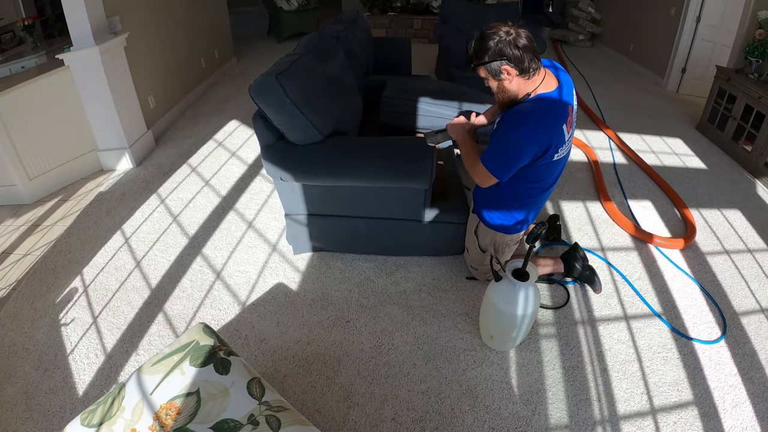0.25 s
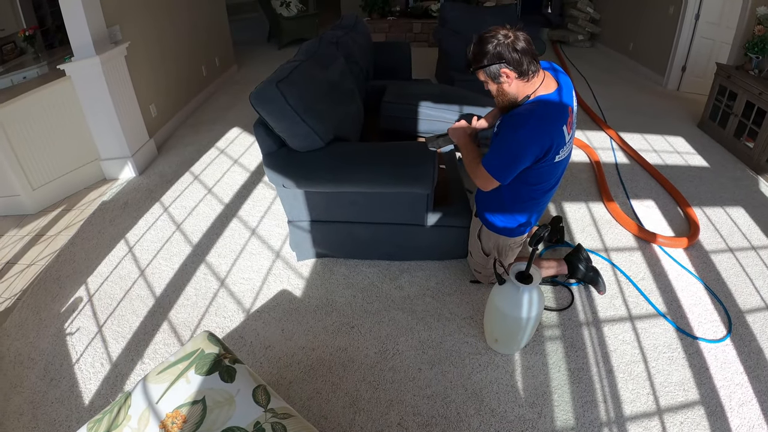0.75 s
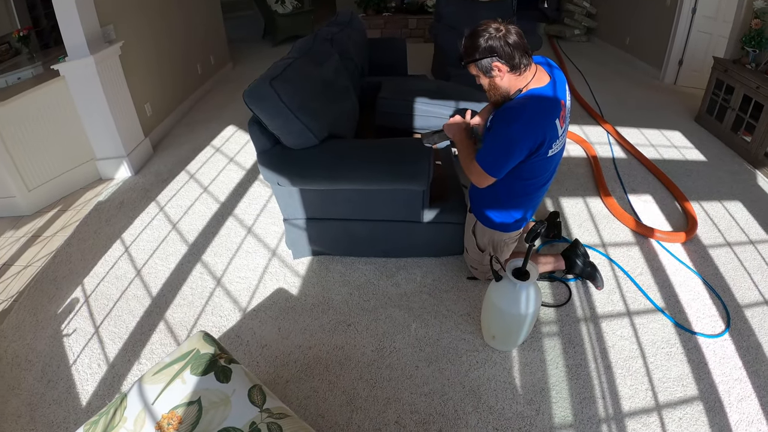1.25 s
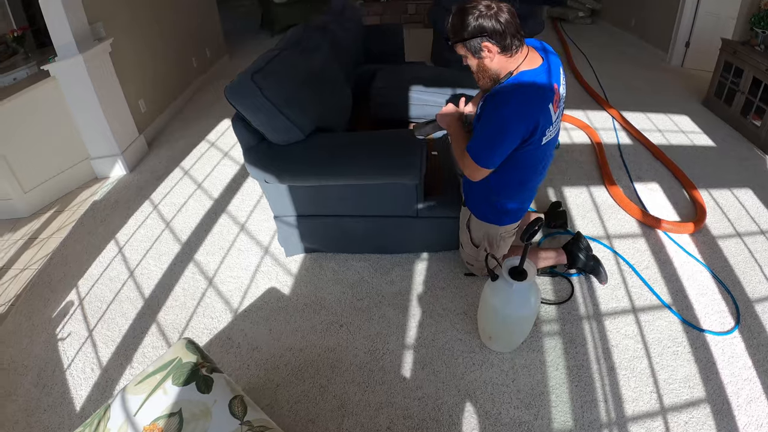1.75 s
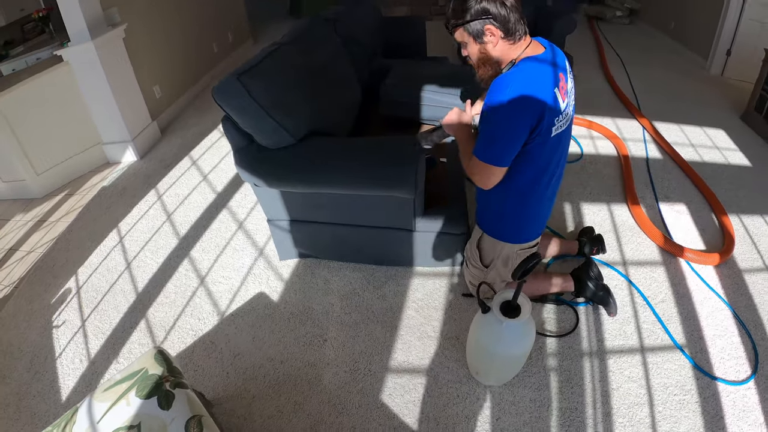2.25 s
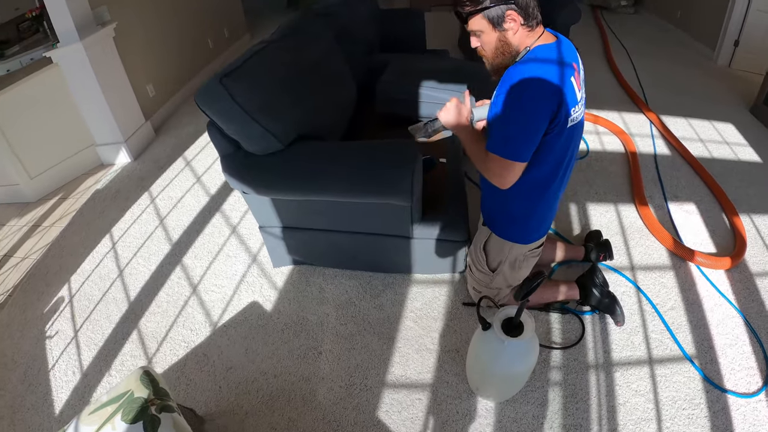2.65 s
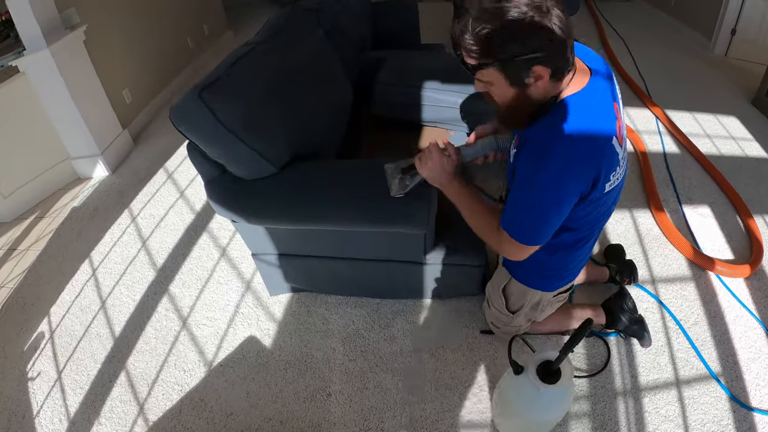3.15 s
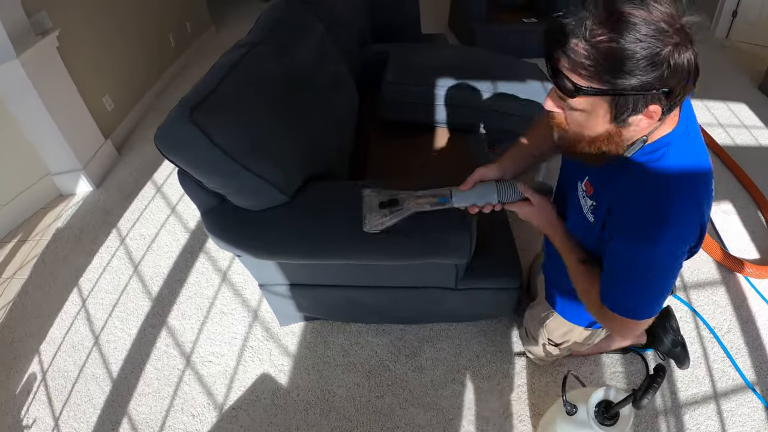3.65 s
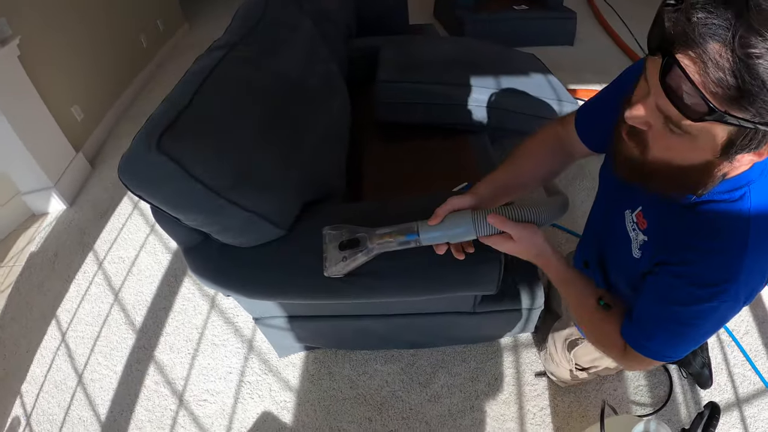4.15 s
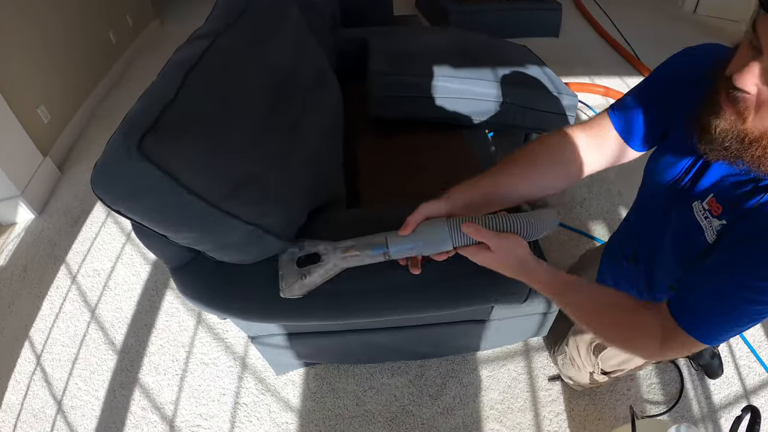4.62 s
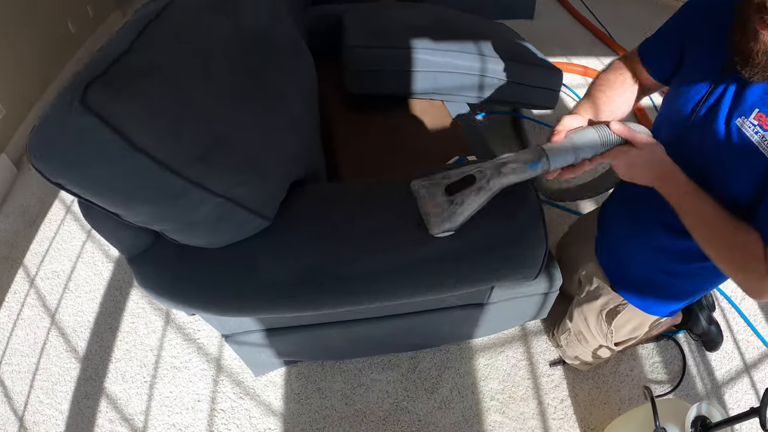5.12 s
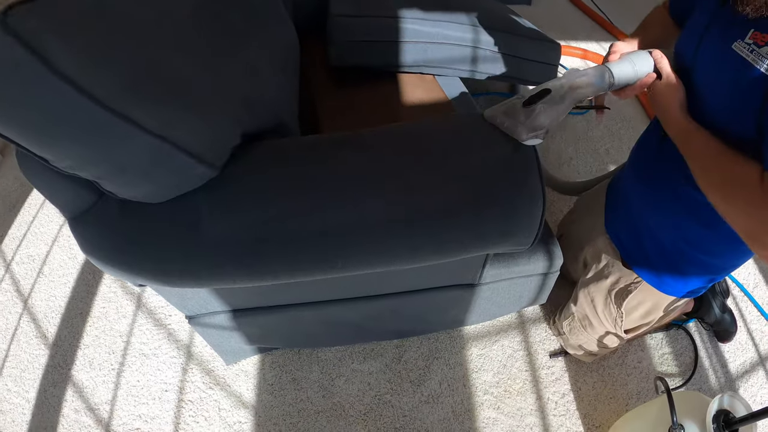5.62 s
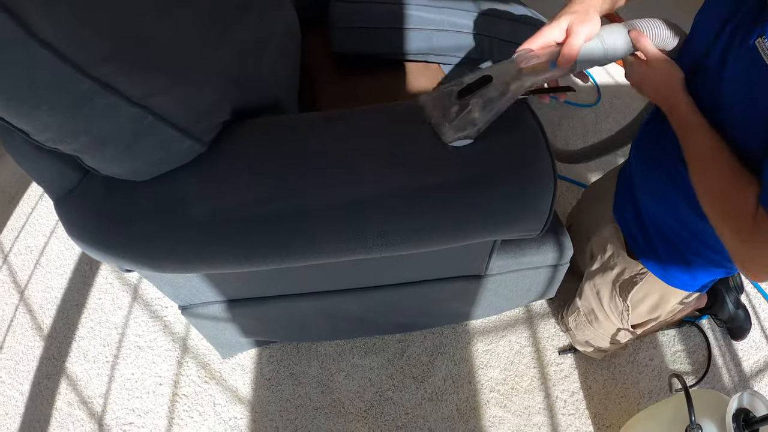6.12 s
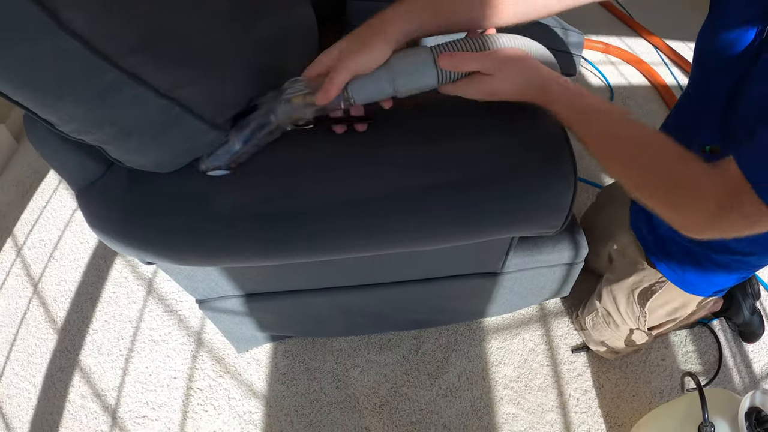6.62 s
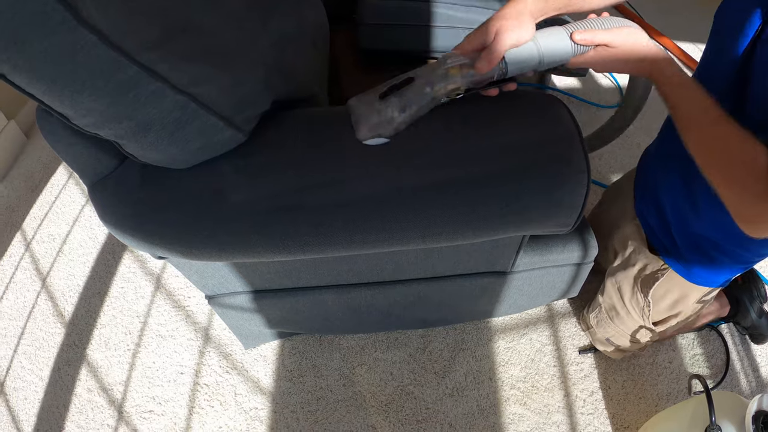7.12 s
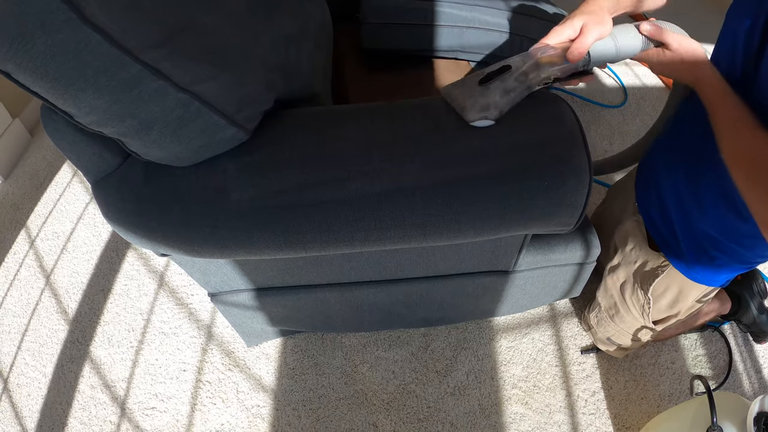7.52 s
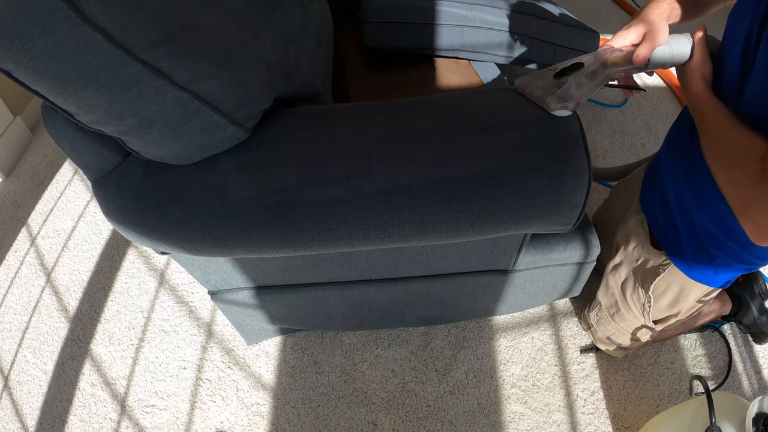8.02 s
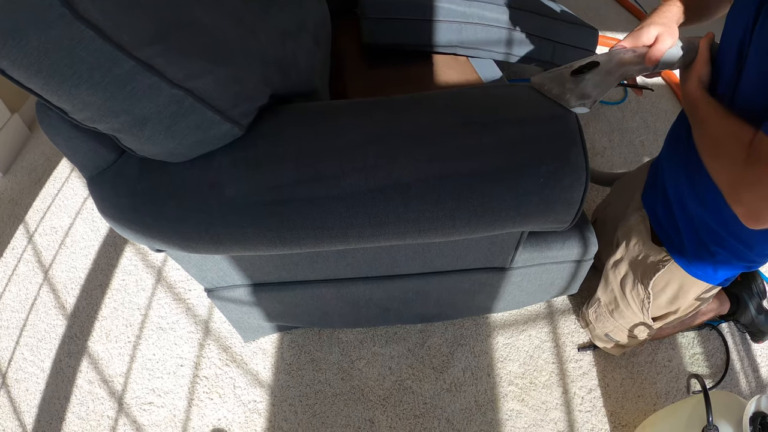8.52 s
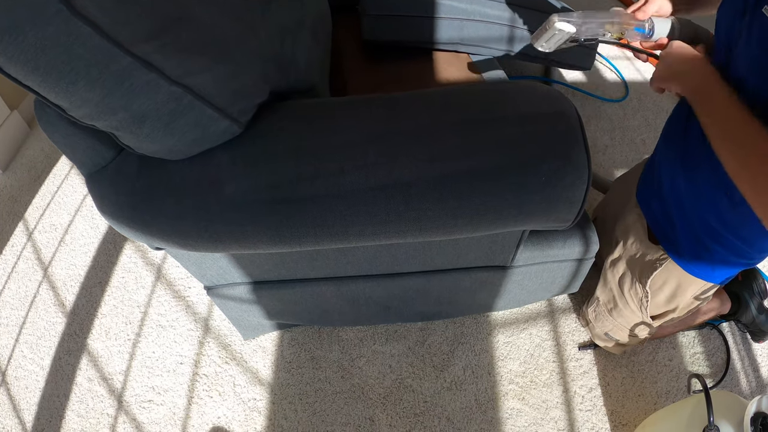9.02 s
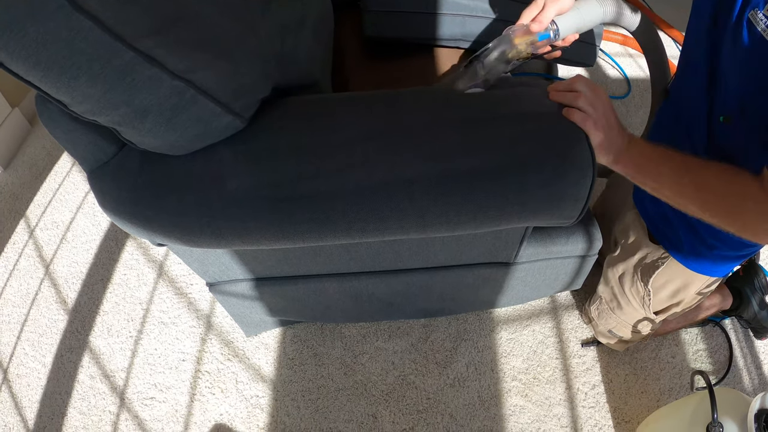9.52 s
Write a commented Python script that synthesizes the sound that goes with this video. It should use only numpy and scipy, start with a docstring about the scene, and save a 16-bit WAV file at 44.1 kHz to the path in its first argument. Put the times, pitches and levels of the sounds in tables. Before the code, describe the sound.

Indoors, a distant machine hums low while a hand suction tool hisses close to the microphone. After a quiet start, wet roars swell as it grips sofa fabric, ending in a slurp. A quick run of dull dabs and bumps follows, then longer presses with a hollow moan and squeak. The open slot hisses brightly, hits one hard bump, and roars again before breaking free.

```python
"""An upholstery extractor's hand tool works over a sofa arm; its machine hums far off, air hisses in the slot.
Short presses come first: filtered turbulence roars and spits droplets. Near 3.5 s a run of dabs and bumps.
Longer presses follow, with damped-mode bumps and gliding-tone moans and squeaks; some end in a slurp.
From 6 s the open slot hisses through squeaks and a hard bump, then the last presses roar and break free."""
import sys
import numpy as np
from scipy import signal
from scipy.fft import irfft
from scipy.io import wavfile
from scipy.ndimage import map_coordinates

SR = 44100
rng = np.random.default_rng(int(sys.argv[2]) if len(sys.argv) > 2 else 0)


def unload_wav(signal):
    """Save mono or channel-first audio to the path in sys.argv[1] as 16-bit WAV at rate SR, clipped to [-1, 1]."""
    wavfile.write(
        sys.argv[1],
        SR,
        np.round(np.clip(np.atleast_2d(signal).T, -1, 1) * 32767).astype(np.int16),
    )


N = 430857

# Table levels are nominal: the functions add trims and slow drifts.
# blower: time_s, pitch_hz, level_db
BLOWER = [(0, 115.1, -52), (1.4, 111.8, -53), (2.85, 116.6, -47.5), (3.4, 119.9, -47), (4.1, 119.9, -50.5),
          (4.75, 120.4, -48), (6, 117.1, -62), (9.35, 115.6, -58.5), (9.55, 120.6, -51.5)]
# blower harmonics: multiple, level_db
BLOWER_ORDERS = [(1, 0), (2, -19.5), (3.5, -26)]
# engine and low rumble: time_s, engine_hz, engine_db, rumble_db
ENGINE = [(0, 32.6, -50.5, -62), (1.3, 33.4, -53.5, -65.5), (2.6, 32.84, -52, -60.5),
          (3.8, 34.06, -46.5, -60.5), (4.8, 34.8, -48, -59.5), (6, 34.7, -55, -65),
          (6.6, 34.93, -51, -61.5), (8.5, 33.82, -50.5, -64), (9.77, 33.8, -51, -62)]
# engine harmonics: multiple, level_db
ENGINE_ORDERS = [(1, 1.5), (1.5, -17), (2.5, -9), (3, -16), (5, -23.5), (7, -20)]
# rumble spectrum: frequency_hz, density_db_per_hz
RUMBLE_COLOUR = [(20, -8), (60, 13.5), (100, 0.5), (170, 0.5), (250, -11.5), (400, -12.5), (900, -56)]

# air into the free slot: time_s, rush_db, edge_db (re rush)
OPEN_AIR = [(0, -51, 5.5), (0.12, -56, 8), (1.1, -56.5, 8), (1.7, -53.5, 7), (3.2, -56, 4),
            (3.4, -49.5, -0.5), (4.1, -52, 4.5), (4.33, -53, 4), (4.55, -49, 6), (6.1, -56.5, 4),
            (6.4, -51.5, 1.8), (6.72, -49, -1), (6.9, -48.7, 4), (7.5, -52, 6.5), (8.1, -54.5, 6.5),
            (9.77, -53.5, 5.5)]
# jet at the slot lip: time_s, hiss_db, sizzle_db (re hiss)
LIP_JET = [(0, -54, -5.5), (1.1, -53.5, -5), (1.9, -48.5, -8.5), (2.25, -49, -9), (2.42, -52.5, -9),
           (2.9, -49, -7), (3.25, -54, -4.5), (3.55, -45, -3), (4.4, -48.5, 0), (4.73, -43, -6),
           (5.3, -47.5, -1), (5.6, -48.5, -4), (6.07, -49.5, -9), (6.4, -45.5, -5.5), (6.78, -41, -6.5),
           (7.25, -47, -2), (8.4, -45.5, -9), (8.88, -46.5, -5), (8.97, -47.5, -10), (9.35, -48.5, -8.5),
           (9.77, -44, -10)]
# air noise spectra: frequency_hz, density_db_per_hz
OPEN_COLOUR = [(130, -10), (230, 0), (390, -4.5), (560, -6), (853, -4), (1220, 2.5), (1820, 3), (3220, 6),
               (5000, 4), (7000, -2.5), (10400, -28)]
ROAR_COLOUR = [(100, -10), (180, -11), (297, -8.5), (505, -14), (800, -5), (1200, 3), (2110, 3.5),
               (3980, 6.5), (6550, -1.5), (10000, -42)]
JET_COLOUR = [(3240, -8), (5500, 4.5), (7440, 1), (8910, 2.5), (11000, -5.5), (12300, -8), (15700, -18)]
# bright air band as the tool reaches forward: time_s, centre_hz, level_db
REACH = [(3.4, 6230, -47.5), (4.05, 6100, -48), (4.35, 5200, -44.5), (4.7, 4730, -48), (4.9, 4510, -44)]
# peaks and notches of free slot, covered mouth and jet, by pose:
# start_s, [(centre_hz, width_hz, gain_db)]
OPEN_POSES = [(0, [(590, 130, -5), (880, 140, 8.5), (1090, 92, -3), (1220, 140, 5.5), (1480, 85, 0),
              (1670, 100, 6.5), (2070, 170, 5), (2805, 220, 8.5), (3260, 80, 6.5), (3600, 140, 9),
              (4040, 170, 3.5), (4810, 91, 7)]), (2.4, [(1520, 90, -3), (1940, 210, -3)]),
              (3.9, [(400, 160, 0.5), (590, 250, -5), (900, 120, 1.5), (1080, 120, -6), (1190, 370, 3),
              (2180, 1400, -6), (6140, 2000, 8)]), (6, [(1280, 110, -2.5), (3170, 775, 4), (3900, 125, 3),
              (5030, 510, 2.5)]), (7.5, [(1179, 430, 4.5), (1284, 135, -7), (6150, 600, -4.5)])]
MOUTH_POSES = [(0, [(1260, 120, 5), (1440, 130, -9), (1630, 210, 5), (2780, 560, 12.5), (3560, 290, 12)]),
               (1, [(510, 120, -6.5), (980, 335, -6), (1350, 90, -7.5), (1690, 240, -6), (3150, 645, 5.5),
               (4770, 560, 4)]), (2.07, [(370, 87, -1), (526, 100, -13), (1120, 92, 6), (1620, 80, -12),
               (1900, 830, 12.5), (2870, 900, 9), (2920, 125, -6), (4360, 170, -7), (4600, 485, 6.5)]),
               (2.34, [(340, 170, 5), (503, 90, 0), (657, 120, 10), (840, 225, 6.5), (1790, 150, 2),
               (2200, 220, 4), (2430, 360, -6), (3000, 900, 5.5), (4380, 375, -5), (4670, 350, 6.5)]),
               (2.95, [(1740, 130, 7), (4130, 260, 3), (4700, 205, -5), (5100, 210, 7)]),
               (4, [(440, 70, -8), (610, 155, 6.5), (940, 200, 2), (1040, 65, -2.5), (1680, 480, -3.5),
               (2270, 95, -3.5), (3860, 75, 4.5)]), (5.15, [(554, 320, 5), (940, 370, -1), (1191, 170, 5),
               (1360, 190, -4), (3470, 470, 5), (4120, 205, 5), (5106, 150, 4)]), (5.64, [(480, 160, -5),
               (1380, 150, -7), (2320, 420, 6.5), (2570, 280, -1.5), (3380, 760, 0.5), (4690, 205, -2),
               (5700, 1400, -5)]), (8, [(1060, 370, 5.5), (1320, 370, -8.5), (1690, 300, 6.5),
               (2610, 150, -6), (3080, 115, 2), (3480, 130, 4), (4580, 165, -6), (6200, 600, -9)]),
               (8.96, [(745, 170, -15), (820, 810, 13.5), (1320, 60, -5), (1990, 330, 6.5),
               (2340, 130, 2.5), (2790, 65, 3), (3090, 365, 6), (4520, 120, -7), (5670, 405, -6)])]
JET_POSES = [(0, [(8730, 400, 1), (12100, 500, -1)]), (3.4, [(8700, 500, 3), (12150, 600, 1)]),
             (5.45, [(8800, 790, 4.5), (11300, 1000, -3)]), (6.2, [(8800, 500, 3), (9700, 500, 1),
             (12300, 700, 3)]), (7.4, [(8400, 740, 3.5), (11900, 800, 3)])]

# bumps of tool and hose on padding: start_s, level_db, pitch_hz, t60_s
BUMPS = [(0.021, -39, 62, 0.21), (3.412, -26, 260, 0.024), (3.64, -27, 270, 0.024),
         (3.723, -26.5, 260, 0.028), (3.812, -30, 236, 0.03), (3.902, -33, 277, 0.034),
         (4.388, -33, 380, 0.018), (7.559, -36, 227, 0.041), (7.77, -38, 188, 0.084),
         (2.299, -35, 210, 0.1), (8.95, -35, 202, 0.081), (6.411, -31, 356, 0.023),
         (6.711, -32.5, 524, 0.03), (6.8302, -19.5, 141, 0.05), (6.872, -41, 190, 0.054),
         (9.4599, -23, 117, 0.03), (9.463, -32, 200, 0.029)]
# hollow drag on padding, one curve each: time_s, pitch_hz, level_db
MOANS = [
    [(4.735, 170, -53), (4.765, 210, -47), (4.795, 169, -49)],
    [(4.79, 301, -57), (4.89, 302, -49), (4.97, 300, -42), (5.09, 300, -57), (5.2, 255, -56),
     (5.36, 230, -51), (5.45, 207.7, -51.5), (5.6, 178.4, -55)],
]
# lip squeaks on cloth, one curve each: time_s, pitch_hz, level_db
SQUEAKS = [
    [(4.935, 570, -50), (4.955, 627, -45), (4.972, 775, -44.5), (4.99, 800, -50)],
    [(6.27, 683, -68), (6.395, 795, -55), (6.415, 725, -56), (6.495, 719, -58), (6.535, 685, -60),
     (6.58, 684, -59), (6.61, 743, -61), (6.67, 680, -60)],
    [(6.712, 770, -52), (6.73, 690, -58), (6.75, 490, -58)],
]
# dabs on fabric, and a short droplet click at 3.784 s: peak_s, level_db, rise_s, fall_s, centre_hz
DABS = [(0.228, -41, 0.011, 0.011, 3600), (3.407, -35.5, 0.011, 0.0081, 2110),
        (3.459, -40.5, 0.006, 0.005, 1700), (3.537, -33.5, 0.005, 0.0056, 2500),
        (3.632, -33.5, 0.012, 0.0058, 2700), (3.636, -30, 0.0021, 0.0015, 1600),
        (3.712, -31.5, 0.013, 0.015, 2380), (3.784, -32, 0.001, 0.001, 3000),
        (3.802, -30.5, 0.015, 0.012, 2360), (3.892, -36, 0.016, 0.02, 2470),
        (3.936, -39.5, 0.013, 0.017, 2330), (4.957, -48, 0.018, 0.021, 820),
        (5.624, -28, 0.017, 0.013, 1390), (5.648, -36, 0.01, 0.014, 5000),
        (6.845, -47, 0.0027, 0.004, 1100), (6.886, -35, 0.003, 0.003, 2200)]
# dab resonances: centre_hz, width_hz, gain_db
DAB_MODES = [(1290, 170, 5), (2360, 460, 17.5), (3420, 100, 22), (4770, 1600, 20)]

# presses: start_s, end_s, attack_s, roar_db, swell_db_per_s, edge_db (re roar), hollow_db (re roar)
PRESSES = [(0.178, 0.36, 0.022, -45, -1, 2.5, -26), (1.702, 1.86, 0.082, -43.5, 24, -2, -16),
           (1.85, 1.995, 0.023, -41.5, 5, 0, -18.5), (2.02, 2.072, 0.023, -40, 8, -2.5, -20),
           (2.065, 2.305, .02, -37.5, 25, -1, -11.5), (2.31, 2.95, 0.027, -37, 1.5, -6, -7.5),
           (2.935, 3.045, 0.03, -39, 0, -0.5, -11), (4.655, 4.77, 0.02, -42, 22, -1, -19),
           (4.776, 5.087, 0.038, -35, -25.5, -9, -10), (5.228, 5.62, 0.13, -35, 4, -8.5, -14),
           (5.639, 5.973, 0.012, -37, -5.5, 1.5, -16), (7.698, 7.83, 0.062, -47, 6, 7, -8.5),
           (8.39, 8.845, 0.1, -40.5, -8.5, 1.5, -13.5), (8.852, 8.957, .025, -38, 3, -1, -16),
           (8.96, 9.469, 0.07, -36.5, 1, -3, -9.5)]
# tuning of the mouth by tool tilt: time_s, shift_semitones
MOUTH_TUNING = [(2.3, 0.52), (2.4, 0.047), (2.96, -0.089), (5.62, 0.11), (5.66, -0.7), (5.97, 0.48),
                (8.4, 0.3), (8.9, -0.25), (9.45, -0.062)]
# slurps as the seal breaks: end_s, level_db, build_s
BREAKS = [(3.035, -37, 0.092), (5.97, -39, 0.16), (8.91, -42, 0.11), (9.48, -38, 0.05)]

# microphone ports: frequency_hz, left_lead_rad
PORT_PHASE = [(100, 0.4), (1000, 0.14), (3000, -0.76), (4600, -0.8), (6000, -1.45), (7900, -1.5),
              (8900, -1.1), (10200, -0.9), (11500, -1.9), (13000, -1)]
# frequency_hz, left_re_right_db
PORT_BALANCE = [(100, 1.5), (1000, -1.9), (3000, 0), (5500, -2.5), (7500, -3.5), (8700, -10), (10400, -4.5),
                (12200, -8.3), (13800, -7.5), (15400, -11)]
# frequency_hz, direct_share (at relative distance 1)
DIRECT = [(30, 0.78), (120, 1), (500, 0.87), (1200, 0.83), (2800, 0.87), (4500, 0.68), (7000, 0.77),
          (10500, 0.68), (13000, 0.38), (15500, 0.3)]
# tool bearing: time_s, extra_right_lead_us, port_balance_share, relative_distance
BEARING = [(0, 13, 0.2, 1.7), (1.9, 9, 0.38, 1.1), (2.7, 9, 0.3, 1), (3.5, 8, 0.75, 1.3),
           (4.8, 2, 0.77, 0.68), (5.6, 16, 0.95, 1), (6.2, 20, 1.05, 1.2), (6.85, -8, 0.75, 1),
           (7.4, 14, 0.85, 1.1), (8.1, 26, 1.17, 1), (8.8, 30, 1.05, 1.1), (9.77, 13, 0.86, 0.92)]

FRAME, HOP, CUTOFF_HZ = 1024, 256, 15750
HOLLOW_HZ, THROAT_HZ, EDGE_HZ = (190, 800), (800, 2600), (2600, 6400)
HISS_HZ, SIZZLE_HZ = (6500, 10500), (10500, 16500)
RELEASE_S = 0.044
BREAK_HISS_DB = -10.5   # slurp treble re its body
OPEN_HOLLOW_DB = -11.5   # free-slot hollow re rush
TIME = np.arange(N) / SR
FRAME_S = np.arange(-(-N // HOP) + 1) * HOP / SR
HZ = np.maximum(np.fft.rfftfreq(FRAME, 1 / SR), 1)[:, None]


def from_db(db):
    """Decibels to amplitude gain."""
    return 10 ** (np.asarray(db) / 20)


def rms_one(x):
    """Scale to unit rms."""
    return x / np.sqrt(np.mean(x ** 2) + 1e-20)


def in_time(rows, t):
    """Columns of a curve, interpolated at times t."""
    time_s, *columns = np.transpose(rows)
    return [np.interp(t, time_s, column) for column in columns]


def at_hz(points):
    """Spectrum table on the frequency grid, interpolated in log frequency."""
    hz, value = np.transpose(points)
    return np.interp(np.log(HZ), np.log(hz), value)


def during(rows, t, fade_s=0.012):
    """1 while a curve lasts, with linear fades centred on its ends."""
    inside_s = np.minimum(t - rows[0][0], rows[-1][0] - t)
    return np.clip(inside_s / fade_s + .5, 0, 1)


def gate(start_s, end_s, attack_s, release_s):
    """Smooth attack, hold and release, half open at start and end."""
    attack = 1 + np.tanh(2 * (FRAME_S - start_s) / attack_s)
    release = 1 + np.tanh(2 * (end_s - FRAME_S) / release_s)
    return attack * release / 4


def drift(rate_hz):
    """Unit-rms random wander: two-pole low-passed noise made at SR / 40."""
    pole = np.exp(-80 * np.pi * rate_hz / SR)
    noise = rng.standard_normal(N // 40 + 2002)
    slow = signal.lfilter([1], [1, -2 * pole, pole * pole], noise)[2000:]   # drop the settling
    return np.interp(np.arange(N) / 40, np.arange(len(slow)), rms_one(slow))


def tone(hz):
    """Unit-rms sine following a pitch curve, from a random phase."""
    return np.sqrt(2) * np.sin(2 * np.pi * (np.cumsum(hz) / SR + rng.random()))


def register(colour, edges_hz):
    """Part of a colour between two soft edges, as unit-mean power."""
    low_hz, high_hz = edges_hz
    part = colour ** 2 / (1 + (low_hz / HZ) ** 12) / (1 + (HZ / high_hz) ** 12)
    return part / part.mean(axis=0)


def resonances(modes):
    """Gain of a cavity whose modes stand out of a flat response."""
    power = 1
    for hz, width_hz, db in modes:
        power = power + from_db(db) ** 2 / (1 + (2 * (HZ - hz) / width_hz) ** 2)
    return np.sqrt(power)


def cavity(poses, shift_s=0.028):
    """Peaks and notches of the air path; each pose crossfades to the next."""
    gains = []
    for _, modes in poses:
        gain_db = sum(db / (1 + (2 * (HZ - hz) / width_hz) ** 2) for hz, width_hz, db in modes)
        gains.append(from_db(gain_db))
    gain = gains[0]
    for (start_s, _), following in zip(poses[1:], gains[1:]):
        moved = np.clip((FRAME_S - start_s) / shift_s + .5, 0, 1)
        gain = (1 - moved) * gain + moved * following
    return gain


def gliding_band(centre_hz, width_hz):
    """One air resonance sliding in pitch, as unit-mean power."""
    band = np.exp(-((HZ - centre_hz) / width_hz) ** 2)
    return band / band.mean(axis=0)


def reflections(strength, count=6):
    """Power ripple of echoes off sofa, body and floor; paths sway as the microphone moves."""
    ripple = 1
    depth = 2 * strength / (1 + strength ** 2)
    # columns: delay_s, sway_hz, start_cycles
    for delay_s, sway_hz, start in rng.uniform([.003, .05, 0], [.008, .3, 1], (count, 3)):
        path_s = delay_s + .00008 * np.sin(2 * np.pi * (sway_hz * FRAME_S + start))
        ripple = ripple * (1 + depth * np.cos(np.float32(2 * np.pi * HZ * path_s)))
    return ripple


def intake(colour, throat, hollow, edge):
    """Power of air drawn through the slot: throat roar, hollow below, edge above."""
    return (throat * register(colour, THROAT_HZ) + hollow * register(colour, HOLLOW_HZ)
            + edge * register(colour, EDGE_HZ))


def eddies(drops_per_s, drops_db, flutter_db, flutter_hz):
    """Turbulence as fluttering noise, with sparse impulses for droplets."""
    drops = (rng.random(N) < drops_per_s / SR) * rng.standard_normal(N)
    air = rng.standard_normal(N) + from_db(drops_db) * rms_one(drops)
    return rms_one(air * from_db(flutter_db * drift(flutter_hz)))


def radiate(source, power):
    """Colour a source; its direct part reaches two ports with phase and level offsets, room parts independent."""
    noises = np.float32(np.vstack([source, rng.standard_normal((2, N))]))
    direct, room_left, room_right = signal.stft(noises, nperseg=FRAME, noverlap=FRAME - HOP)[2]
    lead_us, balance_share, distance = in_time(BEARING, FRAME_S)
    phase = np.float32(at_hz(PORT_PHASE) - 2 * np.pi * HZ * lead_us / 1e6)
    tilt = np.float32(from_db(at_hz(PORT_BALANCE) * balance_share / 2))
    share = np.float32(np.clip(at_hz(DIRECT), .01, 1)) ** np.float32(np.abs(distance))
    direct_gain, room_gain = np.sqrt(share), np.sqrt(1 - share)
    turned = direct * (np.cos(phase) + 1j * np.sin(phase))
    left = (direct_gain * turned + room_gain * room_left) * tilt
    right = (direct_gain * direct + room_gain * room_right) / tilt
    centre = (tilt ** 2 + tilt ** -2 + 2 * share * np.cos(phase)) / 4   # power of the ports' mean
    ports = np.array([left, right]) * np.sqrt(np.float32(power) / centre)
    return signal.istft(ports, nperseg=FRAME, noverlap=FRAME - HOP)[1][:, :N]


def orders(hz, levels, waver_db=0.75):
    """Wavering multiples of a turning speed."""
    return sum(from_db(db + waver_db * drift(5.2)) * tone(hz * multiple) for multiple, db in levels)


def machine(blower_db=0.06, engine_db=-2.5, rumble_db=7.5):
    """Distant machine: low orders of blower and engine, over noise rumble of hose and room."""
    hz, db = in_time(BLOWER, TIME)
    blower_hz = hz * (1 + 0.0019 * drift(7.8))
    blower = from_db(db + blower_db + 0.34 * drift(6.2)) * orders(blower_hz, BLOWER_ORDERS)

    hz, db, _ = in_time(ENGINE, TIME)
    engine_hz = hz * (1 + 0.0112 * drift(4.3))
    engine = 0
    for multiple, order_db in ENGINE_ORDERS:
        gain = from_db(db + engine_db + order_db + 1.85 * drift(2.6))
        engine = engine + gain * tone(engine_hz * multiple)

    floor = from_db(at_hz(RUMBLE_COLOUR)) ** 2
    level_db = in_time(ENGINE, FRAME_S)[-1] + rumble_db
    power = floor / floor.mean() * from_db(level_db) ** 2
    return blower + engine + radiate(rng.standard_normal(N), power)


def slurps(attack_s=0.041, release_s=0.0076):
    """Power of air squeezing in while the seal breaks."""
    return sum(from_db(db) ** 2 * gate(end_s - build_s, end_s, attack_s, release_s)
               for end_s, db, build_s in BREAKS)


def open_air(sealed_db=-3.5, rush_db=3.0, seal_s=0.027):
    """Free slot: rush, lip jet and reach band; fabric partly shuts off the rush."""
    covered = sum(gate(start_s, end_s, seal_s, seal_s) for start_s, end_s, *_ in PRESSES)
    db, edge_db = in_time(OPEN_AIR, FRAME_S)
    flow = from_db(db + rush_db + sealed_db * covered) ** 2
    colour = from_db(at_hz(OPEN_COLOUR)) * cavity(OPEN_POSES)
    rush = intake(colour, flow, flow * from_db(OPEN_HOLLOW_DB) ** 2, flow * from_db(edge_db) ** 2)

    hiss_db, sizzle_db = in_time(LIP_JET, FRAME_S)
    lip = from_db(at_hz(JET_COLOUR)) * cavity(JET_POSES)
    hiss = from_db(hiss_db) ** 2 + from_db(BREAK_HISS_DB) ** 2 * slurps()
    jet = hiss * (register(lip, HISS_HZ) + from_db(sizzle_db) ** 2 * register(lip, SIZZLE_HZ))

    reach_hz, reach_db = in_time(REACH, FRAME_S)
    reach_power = from_db(reach_db) ** 2 * during(REACH, FRAME_S)
    reach = reach_power * gliding_band(reach_hz, width_hz=1040)

    power = (rush + jet + reach) * reflections(strength=.055)
    return radiate(eddies(drops_per_s=460, drops_db=-10.0, flutter_db=1.3, flutter_hz=10.4), power)


def bumps(tail_db=-21, tail_t60_s=0.31, slap_db=-15, slap_t60_s=0.047, slap_hz=700):
    """Padded knocks: dull noise slap, heavily damped modes, short room tail."""
    overtones = ((1, 0), (1.45, -8), (2.3, -16), (4.2, -21))   # ratio, level_db
    out = np.zeros(N)
    for start_s, db, hz, t60_s in BUMPS:
        start = int(start_s * SR)
        t = TIME[:min(SR // 2, N - start)]
        body = 0
        for ratio, mode_db in overtones:
            decay = from_db(mode_db - 60 * t * ratio / t60_s)
            body = body + decay * np.sin(2 * np.pi * hz * ratio * t)
        band = signal.butter(2, [hz * 0.6, hz * 1.23], "band", fs=SR, output="sos")
        tail = rms_one(signal.sosfilt(band, rng.standard_normal(len(t))))
        tail = tail * from_db(tail_db - 60 * t / tail_t60_s)
        soft = signal.butter(2, slap_hz, fs=SR, output="sos")
        slap = rms_one(signal.sosfilt(soft, rng.standard_normal(len(t))))
        slap = slap * from_db(slap_db - 60 * t / slap_t60_s)
        onset = 1 - np.exp(-t / 0.0032)
        out[start:start + len(t)] += from_db(db) * (body + slap + tail) * onset
    return out


def rubbing(rows, jitter, rough_db, level_db):
    """Tool sliding on cloth: a tone with random pitch jitter (fraction) and level roughness."""
    hz, db = in_time(rows, TIME)
    wavering = tone(hz * (1 + jitter * drift(108))) * from_db(rough_db * drift(30))
    return from_db(db + level_db) * during(rows, TIME) * rms_one(wavering)


def moans():
    """Low hollow rubbing of tool and hose dragged over the padding."""
    return sum(rubbing(rows, jitter=0.0677, rough_db=2.5, level_db=-0.5) for rows in MOANS)


def squeaks():
    """Higher, rougher rubbing of the lip on cloth."""
    return sum(rubbing(rows, jitter=0.0271, rough_db=4.0, level_db=5.0) for rows in SQUEAKS)


def dabs(level_db=-3.5, room_db=-7.0):
    """Slot catches fabric: an air burst through mouth resonances swells and snaps shut; the shortest row is a
    droplet click."""
    out = np.zeros((2, N))
    t = TIME[:SR // 5] - TIME[SR // 10]   # zero at the peak
    for peak_s, db, rise_s, fall_s, hz in DABS:
        damped = resonances(DAB_MODES) / np.sqrt(1 + (HZ / hz) ** 4)
        power = register(damped, (hz / 2.7, hz * 4))
        mouth = np.roll(irfft(np.sqrt(power[:, 0])), FRAME // 2)
        air = rng.standard_normal(len(t)) + from_db(room_db) * rng.standard_normal((2, len(t)))
        burst = signal.fftconvolve(air, mouth[None], "same")
        swell = np.exp(-(t / np.where(t < 0, rise_s, fall_s)) ** 2 / 2)
        start = int((peak_s + t[0]) * SR)
        out[:, start:start + len(t)] += from_db(db + level_db) * swell * burst
    return out


def pressing(snag_db=0.54, snag_hz=12):
    """Throat, hollow and edge power of the presses; level wanders as the slot snags."""
    throat = hollow = edge = 0
    snag = np.interp(FRAME_S, TIME, drift(snag_hz))
    for start_s, end_s, attack_s, db, swell_db_per_s, edge_db, hollow_db in PRESSES:
        from_middle_s = np.clip(FRAME_S, start_s, end_s) - (start_s + end_s) / 2
        level_db = db + swell_db_per_s * from_middle_s + snag_db * snag
        roar = from_db(level_db) ** 2 * gate(start_s, end_s, attack_s, RELEASE_S)
        throat = throat + roar
        hollow = hollow + roar * from_db(hollow_db) ** 2
        edge = edge + roar * from_db(edge_db) ** 2
    return throat, hollow, edge


def retune(gain):
    """Tool tilt slides all mouth resonances together."""
    stretch = 2 ** (in_time(MOUTH_TUNING, FRAME_S)[0] / 12)
    line, frame = np.indices(gain.shape)
    return map_coordinates(gain, [line / stretch, frame], order=1, mode="nearest")


def gurgle(depth_db, rate_hz, width_hz):
    """Sloshing water favours changing narrow bands, less above the throat: a unit-mean power gain."""
    line, frame = np.broadcast_arrays(HZ / width_hz, FRAME_S * rate_hz)
    slosh = map_coordinates(rng.standard_normal((200, 1000)), [line, frame], order=1, mode="mirror")
    power = from_db(depth_db * rms_one(slosh) / (1 + (HZ / EDGE_HZ[0]) ** 4)) ** 2
    return power / power.mean()


def suction():
    """Air and water tear through fabric into the covered mouth; breaking seals add edge."""
    throat, hollow, edge = pressing()
    colour = from_db(at_hz(ROAR_COLOUR)) * retune(cavity(MOUTH_POSES))
    power = intake(colour, throat, hollow, edge + slurps())
    power = power * reflections(strength=.06) * gurgle(depth_db=1.5, rate_hz=36, width_hz=170)
    return radiate(eddies(drops_per_s=650, drops_db=-12.5, flutter_db=0.96, flutter_hz=100), power)


def scene():
    """Machine, air noise and contact sounds together."""
    return machine() + open_air() + bumps() + moans() + squeaks() + dabs() + suction()


def record(dry):
    """Steep elliptic low-pass at CUTOFF_HZ."""
    return signal.sosfilt(signal.ellip(12, .1, 80, CUTOFF_HZ, fs=SR, output="sos"), dry)


dry = scene()
out = record(dry)
unload_wav(out)
```